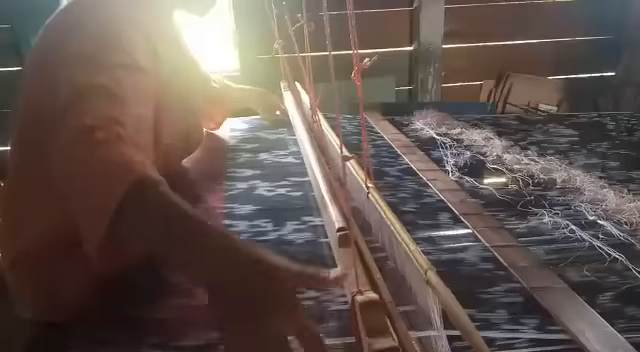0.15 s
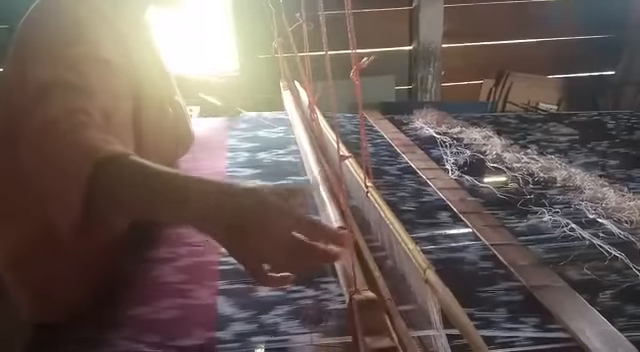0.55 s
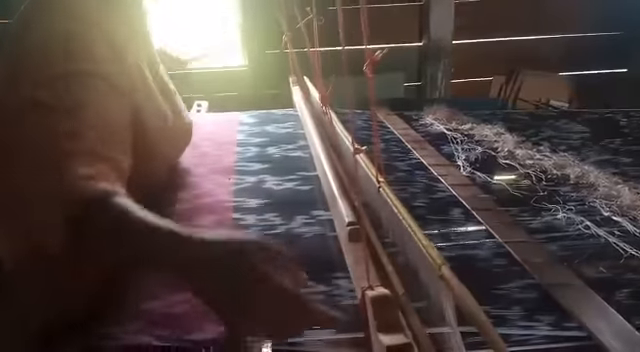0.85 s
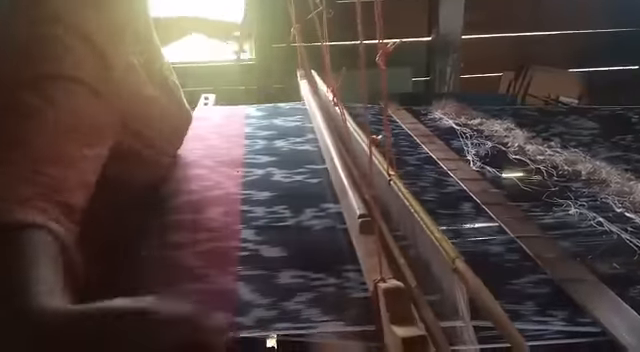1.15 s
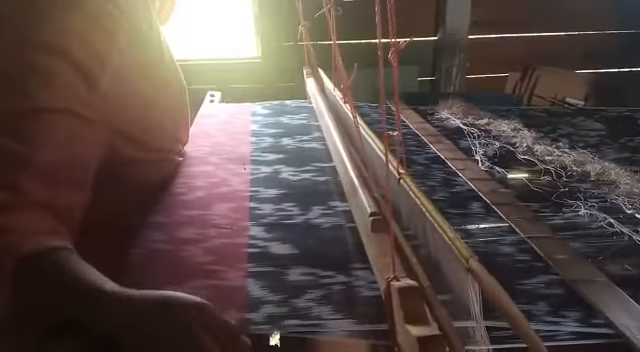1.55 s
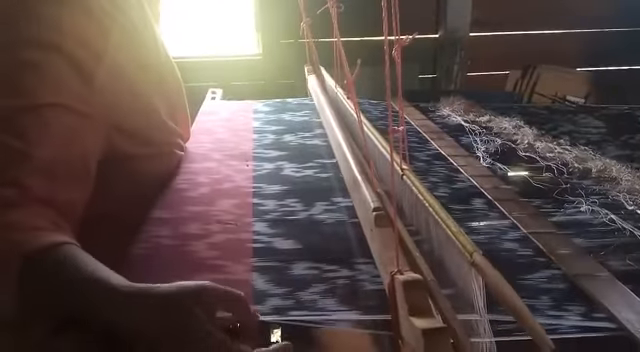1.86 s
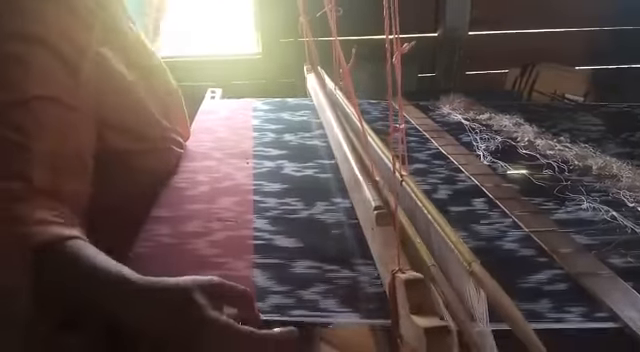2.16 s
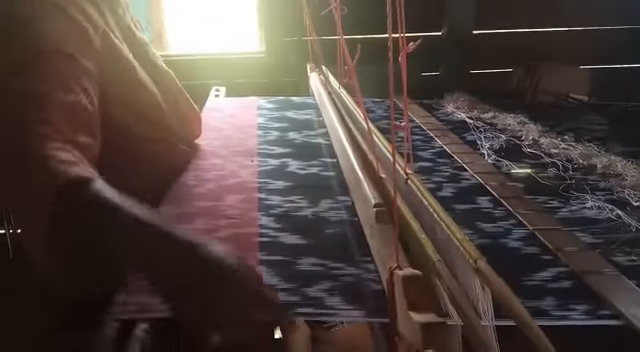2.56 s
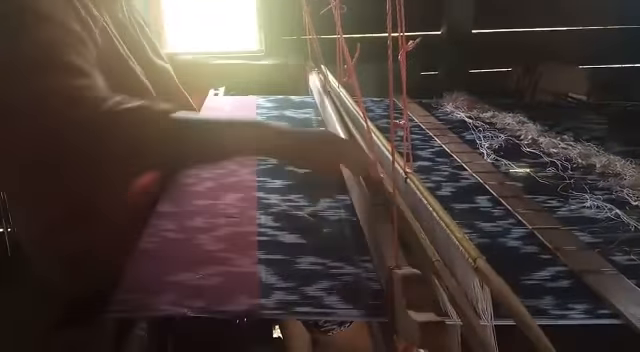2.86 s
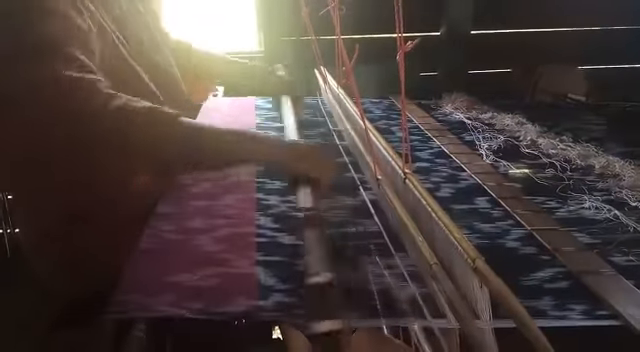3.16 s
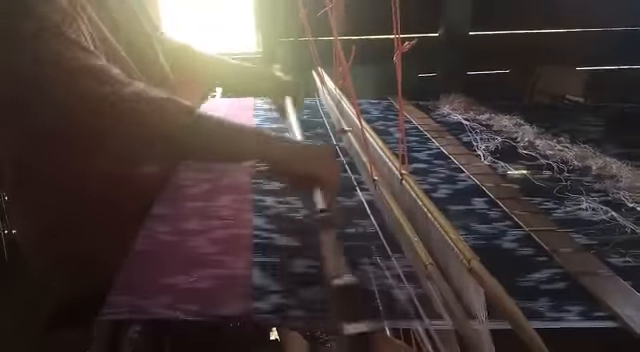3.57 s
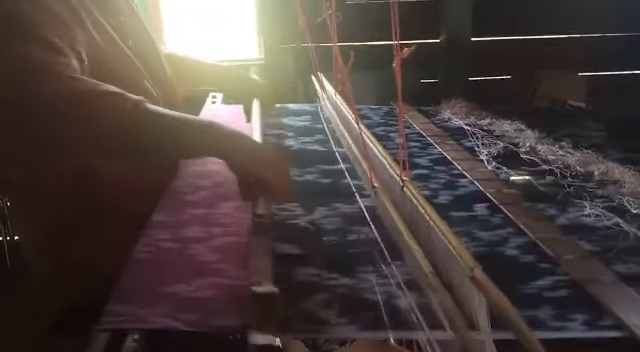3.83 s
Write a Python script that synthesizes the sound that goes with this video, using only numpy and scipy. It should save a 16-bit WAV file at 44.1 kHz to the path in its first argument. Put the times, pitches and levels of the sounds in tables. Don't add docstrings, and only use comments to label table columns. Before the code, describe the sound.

Wooden loom, close and dry with a short dense room tail. Sharp clacks at 0.2, 0.5 and 0.75 s; rustling thread and a rough squeak rising from 0.64 to 0.75. Clacks with hollow rod rings at 1.0 and 1.44, then near quiet. Light slats around 2.1, a firmer knock at 2.6, a heavy rattling thud at 3.37, the loudest at 3.85. Faint rumble, hum and hiss.

```python
import sys
import numpy as np
from scipy import signal
from scipy.fft import rfft, irfft, next_fast_len
from scipy.io import wavfile
from scipy.ndimage import uniform_filter1d, map_coordinates

SR = 44100
rng = np.random.default_rng(int(sys.argv[2]) if len(sys.argv) > 2 else 0)


def decibels_to_gain(level_db):
    exponent = np.asarray(level_db, float) / 20
    return 10 ** exponent


def wrap_up_sound(samples):
    columns = np.atleast_2d(samples).T
    tamed = np.clip(columns, -1, 1)
    steps = np.round(tamed * 32767).astype(np.int16)
    wavfile.write(sys.argv[1], SR, steps)


N = 176400


def unit(x):
    return x / np.sqrt(np.mean(x ** 2))


def colour(x, table, per=decibels_to_gain):
    n = next_fast_len(x.shape[-1])
    table = np.array(table, float)
    f = np.maximum(np.arange(n // 2 + 1) * SR / n, 1)
    outline = np.interp(np.log(f), np.log(table[:, 0]), table[:, 1])
    return irfft(rfft(x, n) * per(outline), n)[..., :x.shape[-1]]


def causal(db):
    cepstrum = irfft(db * np.log(10) / 20)
    half = len(cepstrum) // 2
    cepstrum[1:half] *= 2
    cepstrum[half + 1:] = 0
    return np.exp(rfft(cepstrum))


def band(x, hz, width):
    return signal.lfilter(*signal.iirpeak(hz, hz / width, fs=SR), x)


def walk(rate):
    k = int(SR / rate)
    steps = np.repeat(rng.standard_normal(N // k + 1), k)
    return unit(uniform_filter1d(steps, k)[:N])


def add(out, x, s):
    i = max(int(s * SR), 0)
    out[..., i:i + x.shape[-1]] += x[..., :N - i]


def ring(hz, db, t60):
    rise_cycles = 0.8
    t, hz = np.arange(SR // 4)[:, None] / SR, np.asarray(hz)
    fade = decibels_to_gain(np.asarray(db) - 60 * t / t60)
    swell = 1 - np.exp(-t * hz / rise_cycles)
    return (fade * swell * np.sin(2 * np.pi * hz * t)).sum(axis=1)


def taps(table):
    out = np.zeros(N)
    for s, db, hz, t60 in table:
        add(out, ring([hz], [db], t60), s)
    return out


def pair(count):
    alike_hz = 557
    mid, side = rng.standard_normal((2, count))
    side = signal.lfilter(*signal.butter(1, alike_hz, "high", fs=SR), side)
    return np.array([mid + side, mid - side])


def hut(x, room_db, lag_s):
    # (f/Hz, t60/s)
    room = [(100, 0.85), (400, 0.3), (1500, 0.38), (5000, 0.31), (15000, 0.22)]
    room_hz, room_t60 = np.array(room).T
    rise_s = 0.00043
    t, tail = np.arange(SR // 2) / SR, 0
    for hz in 60 * 2. ** np.arange(9):
        t60 = np.interp(np.log(hz), np.log(room_hz), room_t60)
        tail = tail + band(pair(len(t)), hz, hz * 0.8) * decibels_to_gain(-60 * t / t60)
    tail = tail * (1 - np.exp(-t / rise_s))
    tail = tail * decibels_to_gain(room_db) / np.sqrt(np.sum(tail ** 2) / 2)
    left = map_coordinates(x, [np.arange(N) - lag_s * SR], mode="nearest")
    return np.array([left, x]) + signal.fftconvolve(x[None], tail, axes=1)[:, :N]


def strike_wood(hits, chatter_s, snap_db, click_db):
    share_hz = (100, 400, 700, 1300, 3400, 6800, 16000)
    tick_s, contact_s = 0.00079, 0.0003
    sub_db, wood_db, crack_db, air_db, level_db = -8.5, 1.5, -11.5, 0.5, 6.5 - 5
    out, t = np.zeros(N), np.arange(4096) / SR
    env = np.exp(-t / chatter_s) + decibels_to_gain(snap_db) * np.exp(-t / tick_s)
    env = env * (1 - np.exp(-t / contact_s))
    for s, db, body, knock, edge in hits:
        grit = np.sign(rng.standard_normal(len(t))) * env
        share = np.array([body + sub_db, body, (body + knock) / 2 + wood_db, knock,
                          crack_db + click_db, edge, edge + air_db])
        share = share - 10 * np.log10(np.array(share_hz) / 10300.0)
        add(out, decibels_to_gain(db + level_db) * colour(grit, np.c_[share_hz, share], causal), s)
    return out


def background():
    # (f/Hz, level/dB)
    rumble_outline = [(15, -22.5), (25, -13.5), (55, -3.5), (80, -8.5), (123, 2.5), (141, -5), (229, -29),
                      (533, -35), (569, -20), (849, -45.5), (5000, -35), (6500, -64), (11000, -120)]
    # (f/Hz, level/dB)
    mains = [(60, -66)]
    # (f/Hz, level/dB)
    hiss_outline = [(1000, -41), (4500, -30), (5800, -3.5), (6800, 4), (9000, 7), (11000, -2),
                    (16000, -0.5)]
    hiss_db = (-61, -49)
    t = np.arange(N) / SR
    rumble = unit(colour(pair(N), rumble_outline)) * decibels_to_gain(-61.5 + 0.88 * walk(1.5))
    hum = sum(decibels_to_gain(db + 2.2 * walk(2.2)) * np.sin(2 * np.pi * hz * t) for hz, db in mains)
    hiss = unit(colour(rng.standard_normal((2, N)), hiss_outline)) * decibels_to_gain(np.array(hiss_db))[:, None]
    return rumble + hum + hiss


def rustle():
    # (t/s, level/dB)
    motion = [(0, -33), (.17, -46.5), (.3, -63), (.42, -65), (0.499, -47.5), (0.621, -41), (0.691, -28.5),
              (0.746, -34), (0.951, -70.5), (1.35, -55), (1.7, -72), (1.78, -56.5), (1.952, -65.5),
              (2.1, -58), (2.32, -66), (3.03, -65), (3.17, -47.5), (3.7, -53.5), (3.95, -49), (4, -28)]
    # (f/Hz, level/dB)
    threads = [(300, -13), (1000, -8.5), (3000, -3.5), (6500, 2.5), (10000, 4.5), (16000, 0.5)]
    grains = rng.standard_normal(N) * decibels_to_gain(2.5 * rng.exponential(size=N) + 2.5 * walk(40))
    level_db = np.interp(np.arange(N) / SR, *np.array(motion).T)
    return unit(colour(grains, threads)) * decibels_to_gain(level_db)


def sticks():
    # (t/s, peak level/dB, then body, knock and edge shares/dB)
    hits = [(0.005, -25.5, -21, -14, -9), (0.184, -13, -32, -14, -12.5), (0.43, -32.5, -32, -20.5, -12),
            (0.491, -22, -43, -17.5, -23.5), (0.754, -12.5, -40, -19, -6.5), (0.891, -30, -30, -16, -7.5),
            (0.909, -33, -25, -18, -23), (0.993, -12.5, -49.5, -24.5, -33.5), (1.08, -27.5, -26, -37, -10),
            (1.181, -44.5, -21, -14.5, -5), (1.286, -33, -23.5, -29.5, -9), (1.344, -35, -37.5, -27, -13),
            (1.383, -28, -41, -27.5, -14.5), (1.427, -33, -17, -30.5, -15),
            (1.44, -12.5, -42.5, -21.5, -25.5)]
    return strike_wood(hits, 0.0059, 14.75, -1.3)


def frame():
    # (f/Hz, width/Hz, level/dB)
    modes = [(54.7, 13, -25), (114, 68, 6.5), (170, 45, 9.5), (214, 41, 3.5), (340, 90, 0), (514, 20, -15),
             (673, 91, 5), (918, 140, -1.5), (1250, 130, -24.5), (1513, 210, -7.5)]
    # (t/s, level/dB, rise/s, t60/s)
    shudders = [
        (3.365, -23, 0.0061, 0.58),
        (3.84, -21.5, 0.061, 1),
        (2.58, -39.5, 0.0211, 0.45),
        (2.6, -74, 0.027, 0.33),
        (3.06, -44, 0.074, 1),
        (1.755, -56, 0.0078, 0.59),
        (0.455, -45.5, 0.039, .6),
        (0.12, -42, 0.026, 0.25),
        (3.77, -47, 0.028, 1),
        (3.3, -45, 0.046, 0.83),
    ]
    t, env = np.arange(N) / SR, np.zeros(N)
    for s, db, rise, t60 in shudders:
        u = np.maximum(t - s, 0)
        env += decibels_to_gain(db - 60 * u / t60) * (1 - np.exp(-u / rise))
    jolts = rng.standard_normal(N) * (rng.random(N) < 500 / SR)
    jolts = jolts + 0.14 * rng.standard_normal(N)

    def body(x):
        return sum(decibels_to_gain(db) * band(x, hz, 1.0 * width) for hz, width, db in modes)

    return body(jolts * env) / np.std(body(jolts))


def rod():
    # (t/s, level/dB, f/Hz, t60/s)
    dull_taps = [(2.578, -23.5, 850, 0.066), (2.698, -20.5, 530, 0.032), (2.748, -33.5, 1010, 0.086),
                 (.186, -30, 650, 0.055), (.205, -25.5, 622.5, 0.087), (.212, -22.5, 1600, .04),
                 (.228, -33.5, 202, 0.078), (2.611, -24, 538, 0.05), (2.613, -21, 1675, 0.034),
                 (.752, -25, 960, 0.037), (3.836, -2, 459.5, 0.05)]
    # (f/Hz, level/dB, t60/s)
    modes = [(200, -6, .13), (1512, -2, .12), (1543, -6, .24), (1750, -13, .07), (2450, -10, .07),
             (3270, -4, .11), (662, -13, .08)]
    # (t/s, level/dB)
    blows = [
        (0.539, -39.5),
        (.993, -22),
        (1.441, -22.5),
    ]
    out = taps(dull_taps)
    hz, db, t60 = np.array(modes).T
    for s, hit_db in blows:
        detuned = hz * (1 + 0.0023 * rng.standard_normal(len(hz)))
        add(out, ring(detuned, db + hit_db, t60), s)
    return out


def squeak():
    # (t/s, pitch f/Hz, level/dB)
    glide = [(.64, 1250, -58), (.655, 1370, -45), (.667, 1680, -38), (.68, 2150, -39), (.69, 2350, -35),
             (.702, 2780, -35), (.714, 3000, -30), (.724, 3150, -36), (.738, 3450, -31), (.748, 3500, -38),
             (.756, 3500, -70)]
    harmonics = (2, 2, -8, -20)
    # (f/Hz, level/dB)
    shuttle_body = [(1500, -2), (2400, 1), (3000, 0), (3250, -12), (4800, -12), (5700, 1), (7000, 0),
                    (9000, -4)]
    s, hz, db = np.array(glide).T
    t = np.arange(N) / SR
    pitch = np.interp(t, s, hz) * (1 + 0.011 * walk(300))
    phase = 2 * np.pi * np.cumsum(pitch) / SR
    tone = sum(decibels_to_gain(g + 3.5 * walk(150)) * np.sin(k * phase) for k, g in enumerate(harmonics, 1))
    level_db = np.interp(t, s, db, left=-120, right=-120)
    return colour(tone * decibels_to_gain(level_db), shuttle_body)


def ticks():
    # (t/s, level/dB, f/Hz, t60/s)
    contacts = [(.717, -29, 450, .035), (1.0795, -26, 15200, .012), (1.0795, -28, 4300, .008),
                (1.181, -32, 15200, .015), (1.181, -42, 6200, .01), (1.398, -27, 4050, .015),
                (1.4405, -17, 4000, .01), (1.877, -36, 4400, .012), (1.877, -42, 6200, .008),
                (2.616, -19, 2600, .015), (3.224, -32, 5000, .005), (3.535, -34, 1700, .02)]
    return taps(contacts)


def beats():
    # (t/s, peak level/dB, then body, knock and edge shares/dB)
    hits = [
        (2.041, -31.5, -30.5, -5.5, -10),
        (2.097, -34, -26, -4.5, -6),
        (2.127, -26.5, -16.5, -25.5, -17),
        (2.215, -34.5, -41, -21, -12.5),
        (2.579, -29, -11, -4, -30),
        (2.61, -12.5, -23.5, -16, -12.5),
        (2.699, -32, -14, -5, -6),
        (3.223, -29, -24.5, -6.5, -7.5),
        (3.249, -37, -13, -19, -36),
        (3.524, -32.5, -13, -15, -6),
    ]
    return strike_wood(hits, 0.0059, 10.6, -0.96)


def blows():
    # (t/s, peak level/dB, then body, knock and edge shares/dB)
    hits = [
        (3.365, -20.5, -12, -14.5, -12.5),
        (3.378, -16.5, -14, -12, -6.5),
        (3.391, -16.5, -4.5, -4.5, -26),
        (3.436, -25.5, -4, -7, -20),
        (3.465, -31, -5.5, -12, -11.5),
        (3.828, -12.5, -28, -5.5, -9),
        (3.836, -15, -7, 0, -46),
        (3.868, -12.5, -7.5, -2, -35.5),
        (3.878, -17, -4.5, -3, -51.5),
        (3.91, -20.5, -9, -0.5, -53.5),
    ]
    # (t/s, level/dB, f/Hz, t60/s)
    joints = [(3.366, -19, 199.5, .06), (3.381, -17, 700, .02), (3.384, -20, 292, 0.044),
              (3.392, -11, 486, 0.036), (3.395, -15, 204, 0.037), (3.403, -13, 408, 0.027),
              (3.414, -19.5, 351, 0.036), (3.423, -18.5, 220, 0.033), (3.433, -20, 603, 0.031),
              (3.437, -12.5, 299, 0.04), (3.448, -19, 305, 0.032), (3.465, -21, 304, 0.024),
              (3.486, -32, 265, .04), (3.5, -27.5, 255, 0.054), (3.838, -8.5, 1100, 0.019),
              (3.846, -10.5, 493, 0.037), (3.877, -10, 700, 0.036), (3.909, -13, 890, .02),
              (3.418, -22, 1760, 0.017), (3.404, -12.5, 987, 0.017), (3.861, -21.5, 200, 0.037),
              (3.8682, 2, 1690, 0.0066), (3.8684, -6.5, 2780, 0.0047), (3.871, -10.5, 477, 0.035),
              (3.874, -11, 1224, 0.027), (3.885, -18.5, 378, 0.041), (3.897, -13.5, 340, 0.056),
              (3.908, -9.5, 400, 0.023), (3.923, -16, 423, .04), (3.94, -19.5, 400, 0.037),
              (3.955, -16, 416, 0.026), (3.957, -20.5, 916, 0.028), (3.969, -17, 219, .03),
              (3.979, -18, 417, .03)]
    return strike_wood(hits, 0.0058, 12.6, -3.5) + taps(joints)


def scene():
    mix = background()
    mix = mix + hut(squeak() + rustle(), -5.5, 0.00024)
    mix = mix + hut(sticks(), 4.7, 0.00025)
    mix = mix + hut(rod(), -8, 0.00011)
    mix = mix + hut(ticks(), -5.5, 0.00028)
    mix = mix + hut(beats(), 5.03, 0.0001)
    return mix + hut(blows() + frame(), -1.6, -0.000084)


def gate(x):
    gate_hz = (9300, 14300)
    floor_db, mask_db = -98, -51
    f, _, z = signal.stft(x, SR, nperseg=1024)
    floor = np.maximum(decibels_to_gain(floor_db), decibels_to_gain(mask_db) * np.abs(z).max(axis=1, keepdims=True))
    treble = (f > gate_hz[0]) & (f < gate_hz[1])
    weak = (np.abs(z) < floor) & treble[:, None]
    return signal.istft(np.where(weak, 0, z), SR, nperseg=1024)[1][:, :N]


def top_cut(x):
    return signal.sosfilt(signal.butter(12, 16850, fs=SR, output="sos"), x)


def record(dry):
    # (f/Hz, level/dB)
    port_left = [(100, -1.5), (1500, 1.5), (4500, 0), (6700, -12), (9100, -17.5), (9800, -22),
                 (13600, -22.5), (15200, -9.5)]
    # (f/Hz, level/dB)
    port_right = [(100, 0.5), (1500, -2.5), (4500, 2.5), (6700, 7), (9100, -20.5), (9800, -20.5),
                  (13600, -25), (15200, 1)]
    bass_hz, top_hz = 45, 15650
    ports = np.array([colour(dry[0], port_left), colour(dry[1], port_right)])
    ports = signal.sosfilt(signal.butter(2, bass_hz, "high", fs=SR, output="sos"), ports)
    ports = signal.sosfilt(signal.ellip(10, 0.5, 45, top_hz, fs=SR, output="sos"), ports)
    return top_cut(gate(ports))


dry = scene()
out = record(dry)
wrap_up_sound(out)
```